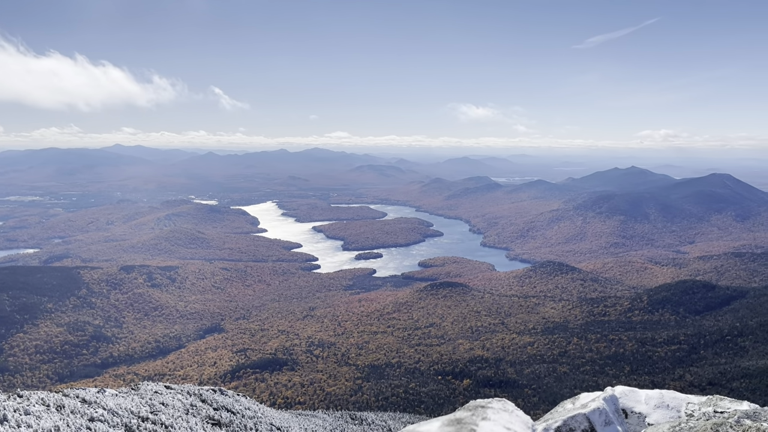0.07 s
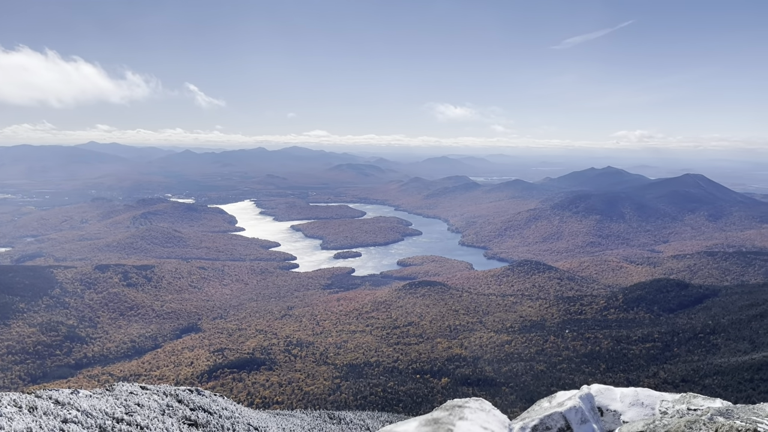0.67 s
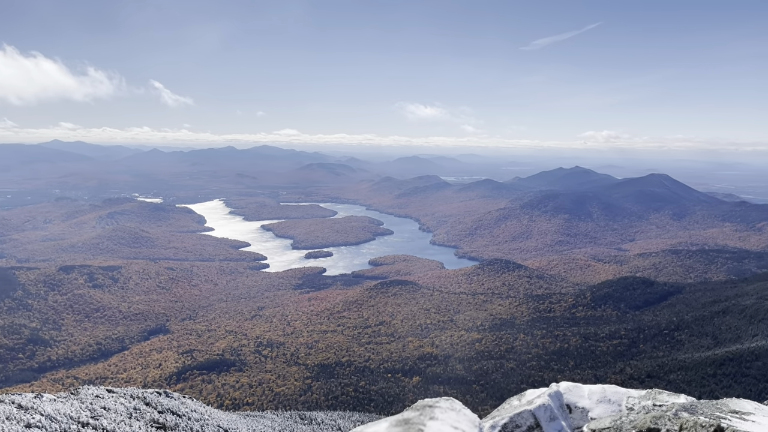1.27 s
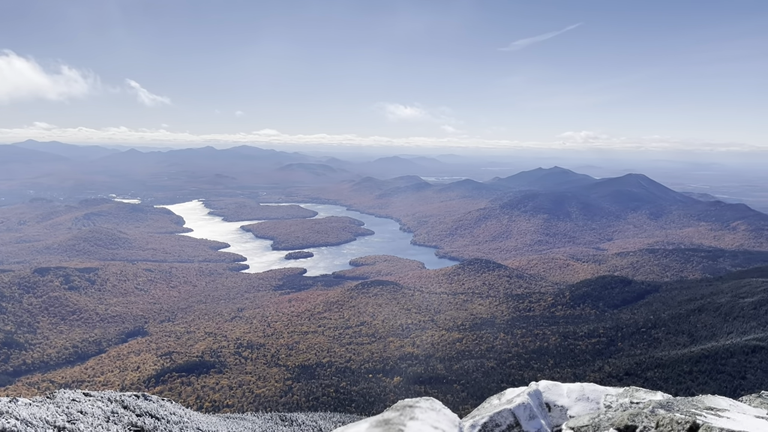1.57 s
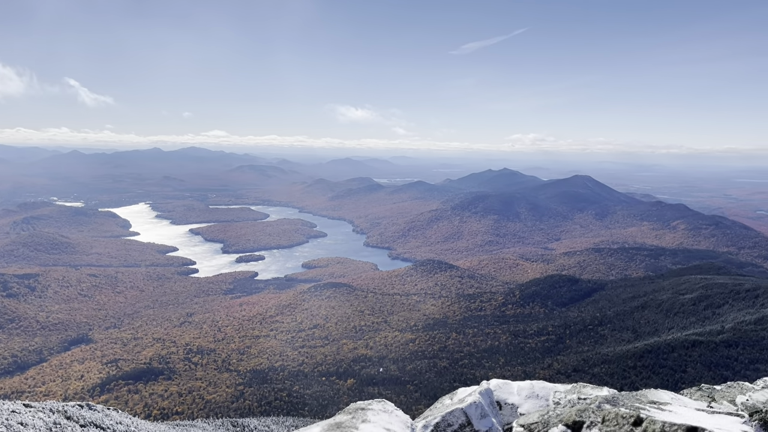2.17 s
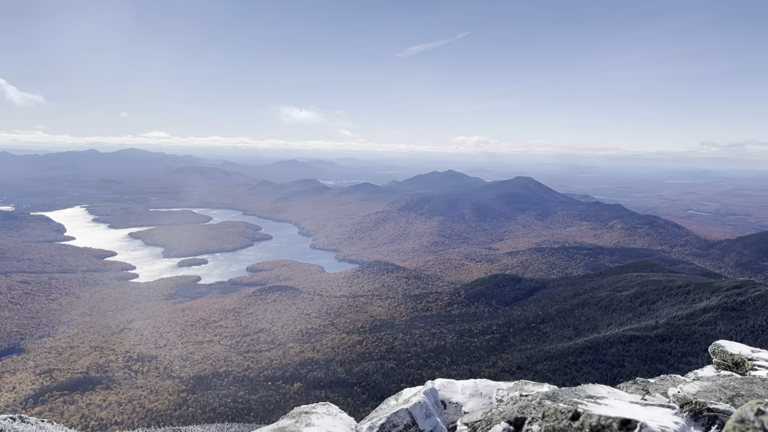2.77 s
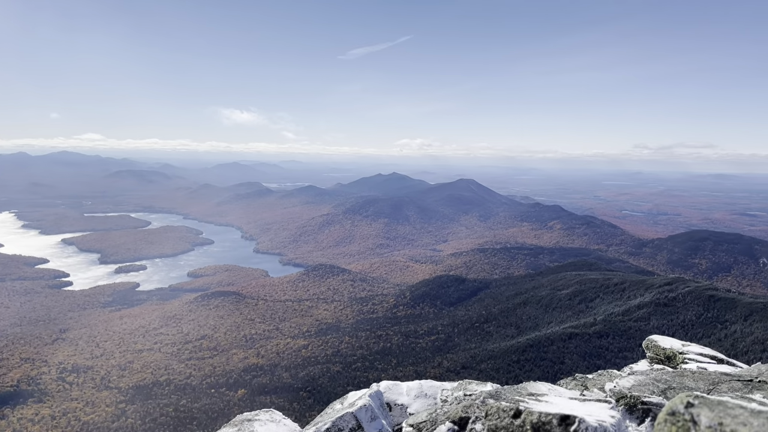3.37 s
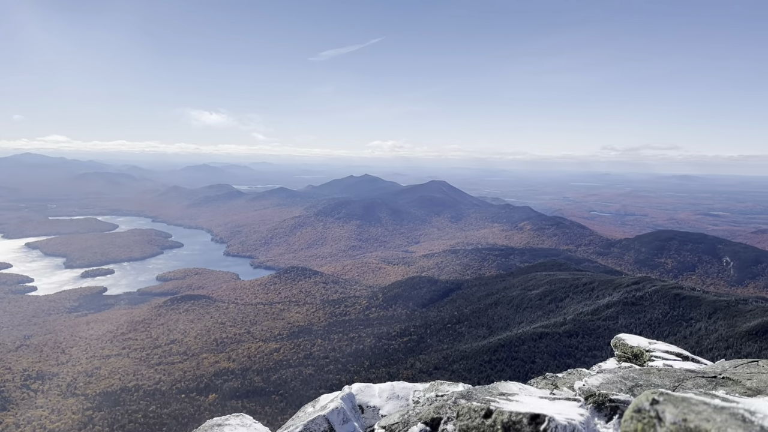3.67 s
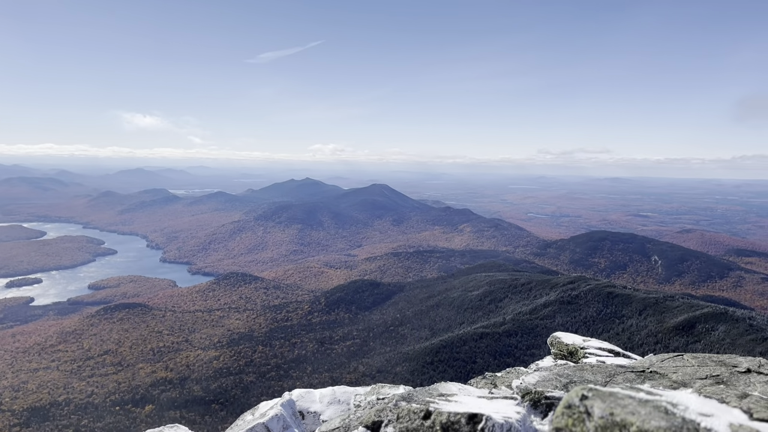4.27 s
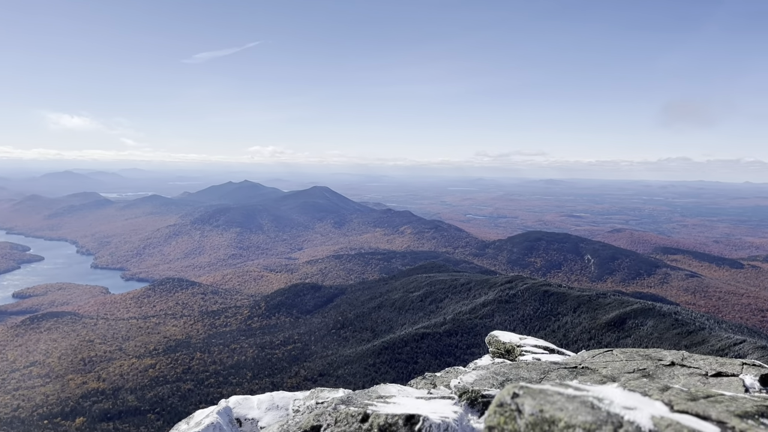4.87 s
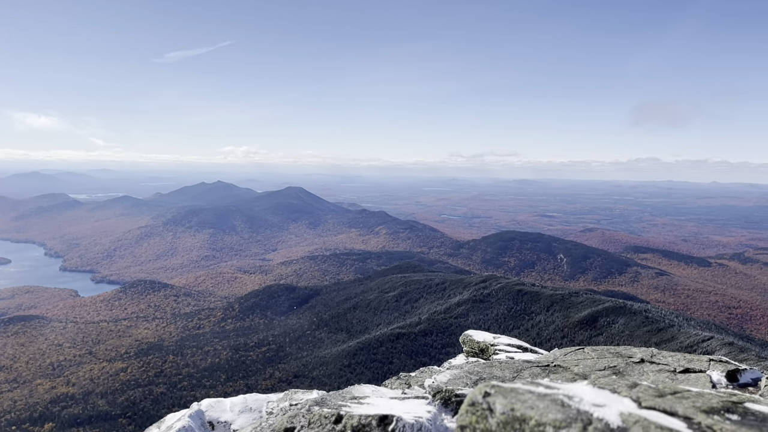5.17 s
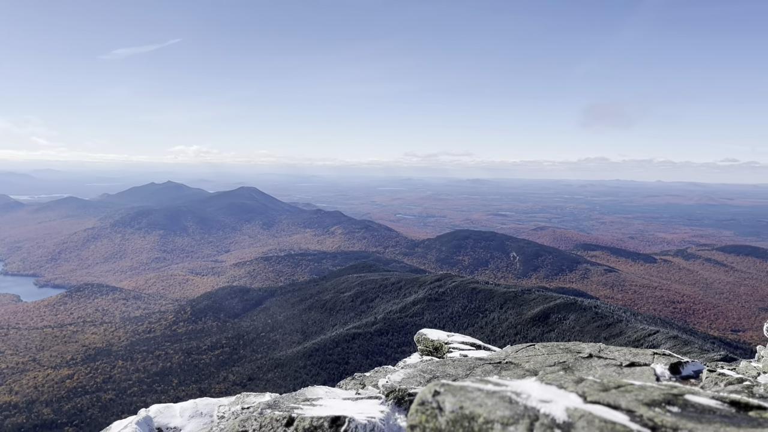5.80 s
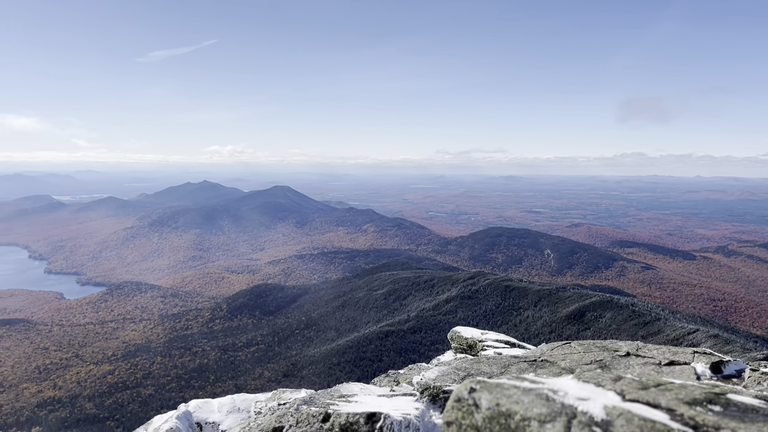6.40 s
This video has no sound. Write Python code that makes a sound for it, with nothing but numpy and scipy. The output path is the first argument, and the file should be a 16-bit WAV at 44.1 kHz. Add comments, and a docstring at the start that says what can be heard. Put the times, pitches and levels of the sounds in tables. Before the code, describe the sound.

Wind rumbles and thumps on the microphone outdoors, drops to a short lull, then gusts again over a faint hiss.

```python
"""Summit wind on a hand-held phone

Wind on a bare mountain top buffets the phone's two microphone openings (ports), eases briefly and returns.
Big swirls of air (eddies) rumble in both ports alike; small ones slap each port more separately and get
brighter and more ragged as they get stronger. The crests of the gusts rush, crack and sing thinly.
The hand on the casing ticks faintly over a hiss of open air."""
import sys
import numpy as np
from scipy import signal
from scipy.fft import rfft, irfft
from scipy.io import wavfile
from scipy.ndimage import uniform_filter1d, minimum_filter1d

SR = 44100
rng = np.random.default_rng(int(sys.argv[2]) if len(sys.argv) > 2 else 0)


def persist_wave(psi):
    """Save psi, clipped to +-1, as 16-bit WAV."""
    counts = np.round(np.clip(psi, -1, 1) * 32767).astype(np.int16)
    wavfile.write(sys.argv[1], SR, np.atleast_2d(counts).T)


N = 292824
TIME = np.arange(N) / SR
FREQS = np.maximum(np.fft.rfftfreq(N, 1 / SR), 1)
REFERENCE_DB, CHOKE_DB = -20, 7  # a typical wind force, and how far above it the ports choke

# how left and right compare: (pitch [Hz], likeness [0-1], left minus right [dB], left lead [radians])
STEREO = [(50.3, 0.95, -1, 0), (157, 0.74, 0, 0.68), (382, 0.87, 0.5, -0.94), (630, 0.44, 3.5, 0.63),
          (1140, 0.8, 4, -2.16), (1790, 0.6, 0, -0.15), (4000, 0, 8, 1)]
# the flow stalls for an instant: (time [s], dip [dB])
STALLS = [(0.058, -7.5), (.365, -9), (0.781, -7.5), (0.84, -4.5), (1.765, -11.5), (1.955, -5.5),
          (2.24, -1.5), (2.55, -9), (2.81, -4), (3.168, -6.5), (3.765, -4), (4.135, -3.5), (4.228, -8.5),
          (4.51, -18.5), (4.815, -4), (4.968, -4), (5.372, -4.5), (6.29, -12), (6.445, -5)]
STALL_S = 0.022  # half length of a stall


def undb(db):
    """Turn decibels into a factor to multiply by."""
    return 10 ** (np.asarray(db) / 20)


def curve(rows):
    """Join (time [s], value) rows by straight lines."""
    return np.interp(TIME, *np.transpose(rows))


def at_pitch(rows, hz, column=1):
    """Read a table between its rows, with the octaves evenly spaced."""
    rows = np.array(rows, float)
    return np.interp(np.log(hz), np.log(rows[:, 0]), rows[:, column])


def noise(gain):
    """Noise of typical size 1, shaped by a gain for each frequency."""
    x = irfft(rfft(rng.standard_normal(N)) * gain, N)
    return x / x.std()


def wander(hz):
    """A smooth random wobble of typical size 1 that changes about hz times a second."""
    return noise(np.exp(-(FREQS / hz) ** 2))


def pan(db):
    """Left and right gains that make the left louder by db."""
    return undb(np.array([[db], [-db]]) / 2)


def decay(start, fade_s):
    """A loudness shape that jumps to 1 at the start and dies away."""
    return (TIME >= start) * np.exp(-np.clip((TIME - start) / fade_s, 0, 40))


def bumps(rows, half_s):
    """A short, rounded rise or dip for each (time [s], height [dB]) row."""
    return sum(db * np.exp(-np.minimum(((TIME - s) / half_s) ** 2, 40)) for s, db in rows)


def burst(envelope, spectrum):
    """Noise that follows a loudness shape, coloured by (pitch [Hz], level [dB]) rows."""
    colour = undb(at_pitch(spectrum, FREQS))
    return irfft(rfft(rng.standard_normal(N) * envelope) * colour / np.sqrt(np.mean(colour ** 2)), N)


def air(flicker_db=0.7):
    """Open air and the microphones make a wide hiss that flickers a little behind the gusts."""
    # colour of the hiss: (pitch [Hz], level [dB per Hz])
    colour = [(200, -69.5), (1000, -91.5), (1800, -90), (3000, -102), (4800, -100), (6800, -108),
              (8600, -118), (10000, -114), (13000, -117.5), (15500, -130)]
    # the hiss swells and sinks: (time [s], change [dB])
    swell = [(0, 2), (2.1, 1.5), (3.1, -2.5), (4.5, 2), (6.64, -2.5)]
    # which port hisses more: (pitch [Hz], left minus right [dB])
    balance = [(1000, 0), (4500, 9.5), (9000, -4.5)]
    balance_db = at_pitch(balance, FREQS) * np.array([[1], [-1]]) / 2
    gain = undb(at_pitch(colour, FREQS) + balance_db) * np.sqrt(SR / 2)
    hiss = irfft(rfft(rng.standard_normal((2, N))) * gain, N)
    return hiss * undb(curve(swell) + flicker_db * wander(hz=18))


def finger_slide(time_s=0.6, half_s=0.079, level_db=-65, grain_db=3.5):
    """A finger shifts its grip with a short, dry rustle."""
    # colour of skin sliding on the casing: (pitch [Hz], level [dB])
    colour = [(2000, -3), (5000, 2.5), (8500, -15), (10500, -0.5), (13500, -3), (15000, -16)]
    return burst(undb(level_db + grain_db * wander(hz=200)) / np.cosh((TIME - time_s) / half_s), colour)


def finger_ticks(ring_db=-19, ring_s=0.012, grain_db=2):
    """Fingers near the left port make grainy snaps, and the casing rings briefly after each."""
    # fingers on the casing: (time [s], level [dB], fading time [s])
    ticks = [(0.534, -46, 0.0009), (0.922, -41, 0.0025), (0.929, -44.5, 0.0048), (2.616, -38, 0.00081),
             (2.753, -50.5, 0.025), (2.913, -38.5, 0.00069), (3.093, -41.5, 0.00086), (3.269, -44, 0.0014),
             (3.448, -49, .002), (3.647, -49, 0.02), (4.091, -42, 0.00095), (5.385, -41, 0.0011),
             (5.855, -52, 0.0058)]
    # colour of the snap: (pitch [Hz], level [dB])
    snap_colour = [(1500, -23), (2600, -6), (3400, 5.5), (4800, 12), (6800, -1), (8500, -15),
                   (11000, -11.5), (15000, -30)]
    # colour of the ringing casing: (pitch [Hz], level [dB])
    ring_colour = [(2600, -21.5), (3800, -6), (4860, -5.5), (5500, -14), (12000, -49.5)]
    snap = sum(undb(db) * decay(s, fade_s) for s, db, fade_s in ticks) * undb(grain_db * wander(hz=300))
    ring = sum(undb(db + ring_db) * decay(s, ring_s) for s, db, _ in ticks)
    return np.array([burst(snap, snap_colour) + burst(ring, ring_colour) for _ in range(2)]) * pan(db=11)


def whistle(force_db, level_db=-72, growth=0.87, follow_s=.04):
    """Hard flow makes each port sing in a thin band of hiss that surges with the gusts."""
    # colour of the singing ports: (pitch [Hz], level [dB])
    colour = [(9000, -28.5), (9480, -0.5), (9750, -2.5), (10000, -12), (12200, -10.5), (15500, -32.5)]
    gust_db = uniform_filter1d(np.minimum(force_db, CHOKE_DB), int(follow_s * SR))
    return np.array([burst(undb(level_db + growth * gust_db), colour) for _ in range(2)])


def rushes(grain_db=3):
    """Fast air rushes past the port edges in soft swells of treble, stronger on the left."""
    # crests of the gusts: (time [s], level [dB], half length [s])
    crests = [(0.123, -43, 0.0096), (0.876, -48.5, .01), (1.334, -34.5, 0.012), (1.565, -37, 0.045),
              (3.881, -33, 0.01), (4.344, -41, 0.021), (4.674, -34.5, 0.028), (4.895, -28, .016),
              (5.193, -39.5, .035), (5.644, -39.5, 0.011)]
    # colour of a rush: (pitch [Hz], level [dB])
    colour = [(700, -3), (2000, 6.5), (3000, -12.5), (5000, -20), (6800, -29.5), (8700, -50)]
    swell = sum(undb(db) / np.cosh(np.clip((TIME - s) / half_s, -40, 40)) for s, db, half_s in crests)
    return burst(swell * undb(grain_db * wander(hz=120)), colour) * pan(db=5)


def cracks(fade_s=0.0011):
    """The hardest eddies snap at the edge of the left port and reach the right one more weakly."""
    # air tears off the edge: (time [s], level [dB])
    snaps = [(0.4, -44), (0.729, -39.5), (1.362, -18.5), (1.548, -20.5), (1.879, -18), (1.896, -27),
             (2.627, -35), (3.874, -14), (4.019, -26.5), (4.296, -21), (4.353, -22.5), (4.561, -36),
             (4.667, -11.5), (4.883, -24), (5.212, -17), (5.269, -21.5), (5.279, -15), (5.462, -35.5),
             (5.828, -26), (5.983, -19.5), (6.478, -28.5)]
    # colour of a crack: (pitch [Hz], level [dB])
    colour = [(500, -14), (1900, 3), (3000, -8), (4700, -19.5), (7000, -34), (9500, -58)]
    return burst(sum(undb(db) * decay(s, fade_s) for s, db in snaps), colour) * pan(db=5)


def wind_force(flow_db, steady_db=-2, eddy_gap_s=0.05, eddy_fade_s=0.0049, scatter_db=5, steepness=2.3):
    """The push on the ports in dB: steady flow plus eddies that arrive faster than they leave."""
    # the main buffets: (time [s], peak force [dB], fading time [s])
    buffets = [(.112, -19, 0.029), (.165, -25, 0.0088), (.329, -24.5, 0.01), (.398, -14.5, 0.01),
               (.525, -19.5, 0.027), (.602, -21.5, 0.0088), (.668, -27.5, 0.0073), (.726, -20.5, 0.018),
               (.8, -20, 0.0087), (.868, -17, 0.019), (.922, -22.5, 0.046), (1.075, -21, 0.02),
               (1.312, -19, 0.034), (1.36, -11, 0.0071), (1.485, -18.5, 0.031), (1.546, -8.5, 0.016),
               (1.633, -14.5, 0.013), (1.692, -17.5, .016), (1.794, -18.5, 0.012), (1.856, -19, 0.0026),
               (1.885, -16.5, 0.016), (2.005, -27, 0.01), (2.155, -22.5, .006), (2.387, -22.5, 0.01),
               (2.625, -24.5, 0.015), (2.675, -24.5, 0.0074), (2.729, -26, 0.0053), (2.85, -29.5, 0.024),
               (2.955, -34.5, .011), (3.055, -24.5, 0.0085), (3.085, -28, 0.004), (3.251, -31, 0.02),
               (3.385, -40.5, 0.005), (3.514, -33.5, 0.011), (3.602, -15.5, 0.0011), (3.838, -19, 0.0094),
               (3.872, 0, 0.012), (3.9, -12, 0.0044), (3.98, -21.5, 0.018), (4.02, -15.5, 0.0034),
               (4.054, -19.5, 0.003), (4.1, -25, 0.0063), (4.19, -17, 0.016), (4.257, -18.5, 0.0058),
               (4.295, -15.5, 0.0077), (4.335, -14.5, 0.034), (4.415, -22, 0.014), (4.56, -11.5, 0.0016),
               (4.63, -17.5, 0.086), (4.698, -11.5, 0.019), (4.75, -17, 0.0053), (4.785, -17, 0.0064),
               (4.842, -18.5, 0.0093), (4.885, -4, 0.015), (4.942, -18.5, 0.007), (4.99, -15, 0.011),
               (5.16, -12.5, 0.02), (5.208, -12, 0.021), (5.283, -15, 0.014), (5.347, -20.5, 0.0061),
               (5.393, -3.5, 0.0078), (5.462, -18, 0.0047), (5.552, -22.5, 0.0046), (5.64, -18.5, 0.015),
               (5.707, -14.5, 0.0024), (5.77, -19.5, 0.011), (5.823, -16, 0.0025), (5.986, -15, 0.01),
               (6.01, -18, 0.0033), (6.052, -20.5, 0.005), (6.122, -22, 0.021), (6.335, -26.5, 0.023),
               (6.603, -18.5, 0.037)]
    # lesser eddies come by chance, about as strong as the flow
    gap, size, span = rng.standard_normal((256, 3)).T
    times = np.cumsum(np.exp(gap / 2)) * eddy_gap_s
    eddy_db = np.interp(times, TIME, flow_db) - 0.14 + scatter_db * np.tanh(size)
    lesser = np.column_stack([times, eddy_db, eddy_fade_s * np.exp(span / 2)])[times < TIME[-1]]
    power = undb(flow_db + steady_db) ** 2
    for s, db, fade_s in [*buffets, *lesser]:
        near = slice(max(int((s - 5 * fade_s) * SR), 0), int((s + 10 * fade_s) * SR))
        age = (TIME[near] - s) / fade_s
        power[near] += (undb(db) / np.cosh(np.where(age < 0, steepness * age, age))) ** 2
    return 10 * np.log10(power) + bumps(STALLS, STALL_S)


def eddies(hz, hold_s=0.033):
    """Eddies of one size: half an octave of pressure swings around hz, evened out in strength."""
    swings = noise(np.cos(np.pi / 2 * np.clip(2 * np.log2(FREQS / hz), -1, 1)))
    window = int(SR * (hold_s + 2 / hz))
    return swings / np.sqrt(uniform_filter1d(swings ** 2, window) + .1)


def rumble_level(gust_db, level_db=1, growth=0.72, wobble_db=2.2):
    """Large eddies rumble with the gusts (in dB); heavy ones swell the rumble and stalls starve it."""
    # the heaviest eddies land as thumps: (time [s], lift [dB])
    thumps = [(.188, 5.5), (.29, 10.5), (.67, 9), (1.1, 3.5), (1.312, 8.5), (1.52, 5), (1.81, 5),
              (1.902, 7), (2.085, 4), (4.196, 4.5), (4.68, 8.5), (4.995, 7), (5.18, 9.5), (5.402, 8.5),
              (5.775, 4.5), (5.828, 4)]
    rumble_db = level_db + growth * gust_db + wobble_db * wander(hz=30)
    return rumble_db + bumps(thumps, half_s=0.02) + .5 * bumps(STALLS, STALL_S)


def wind(flow_db, force_db, flutter_db=1.82, knee_db=2, tear_db=2.5, drift_db=2.23):
    """Churning air, band by band: low bands follow the large eddies, high ones the push on the ports."""
    # colour of the churning air at the typical force: (pitch [Hz], level [dB per Hz])
    turbulence = [(20, -54.5), (30, -57), (45, -38), (70, -32), (120, -37.5), (200, -42), (400, -42),
                  (700, -49.5), (1000, -56.5), (1700, -73), (2800, -88), (8000, -117), (15000, -130)]
    # how fast each pitch grows with force: (pitch [Hz], growth [dB per dB])
    growth = [(200, 1.21), (350, 1.14), (500, 1.24), (1000, 1.8), (2000, 2.5), (4000, 2), (9000, -0.6)]
    # how closely the bass follows single eddies: (pitch [Hz], share [0-1])
    thump_share = [(35, 0.26), (70, 0.45), (140, 0.87)]
    gust_db = uniform_filter1d(force_db, int(0.22 * SR))  # the force, averaged over 0.22 s
    rumble_db = rumble_level(gust_db)
    thump_db = force_db - gust_db  # whatever stands out of the gust thumps in the bass
    push_db = force_db + flutter_db * wander(hz=70)
    # the ports choke: the hardest pushes gently level off
    push_db = push_db - knee_db * np.logaddexp(0, (push_db - CHOKE_DB) / knee_db)
    # air tears off the edge of each port in short spits
    spits_db = tear_db * np.array([wander(hz=400), wander(hz=400)])
    tilt_db_per_octave = -0.4 + 0.16 * (flow_db - REFERENCE_DB)  # faster flow sounds brighter
    large_hz, small_hz = 130, 280  # between these, large eddies give way to small ones
    drift = wander(hz=20)
    pressure = np.zeros((2, N))
    for hz in 22 * 2 ** (np.arange(19) / 2):
        cycle = int(SR / hz)  # a low band needs about one cycle to answer a thump
        answer_db = uniform_filter1d(thump_db, cycle, origin=(cycle - 1) // 2)
        large_db = rumble_db + at_pitch(thump_share, hz) * answer_db
        drift = .7 * drift + .7 * wander(hz=20)  # each band comes and goes with its neighbours
        small_db = at_pitch(growth, hz) * (push_db + min(hz / 1500, 1) * spits_db)
        small_db = small_db + tilt_db_per_octave * np.clip(np.log2(hz / 700), -2, 2) + drift_db * drift
        small_share = np.clip(np.log(hz / large_hz) / np.log(small_hz / large_hz), 0, 1)
        band_db = at_pitch(turbulence, hz) + (1 - small_share) * large_db + small_share * small_db
        alike = np.clip(at_pitch(STEREO, hz), 0, 1)
        shared = eddies(hz) * np.sqrt((1 + alike) / 2)
        apart = eddies(hz) * np.sqrt((1 - alike) / 2)
        width_hz = hz * np.log(2) / 2
        gain = np.sqrt(width_hz) * undb(band_db) * pan(at_pitch(STEREO, hz, column=2))
        pressure += gain * np.array([shared + apart, shared - apart])
    return pressure


def through_phone(pressure):
    """The port hollows colour the wind; the phone's stereo processing puts left and right out of step."""
    # resonances of the hollows: (pitch [Hz], width [Hz], lift [dB])
    cavities = [(1900, 67, 3), (2040, 800, -1)]
    lift_db = sum(db / (1 + (2 * (FREQS - hz) / width) ** 2) for hz, width, db in cavities)
    phase_turn = np.exp(.5j * at_pitch(STEREO, FREQS, column=3) * np.array([[1], [-1]]))
    soft_ends = np.clip(np.minimum(TIME, TIME[::-1]) / .004, 0, 1)
    return irfft(rfft(pressure * soft_ends) * undb(lift_db) * phase_turn, N)


def scene():
    """Wind, hiss and hand together."""
    # steady flow over the ports, two long gusts with a lull between: (time [s], force [dB])
    flow = [(0, -27), (.5, -23.5), (.8, -31), (1.2, -27.5), (1.32, -21), (1.62, -20), (2.05, -23),
            (2.22, -31.5), (2.78, -38), (3.05, -29.5), (3.33, -49), (3.47, -50.5), (3.64, -25.5),
            (3.85, -20), (4.1, -29), (4.62, -19.5), (5.25, -20), (5.45, -23.5), (6.45, -26), (6.64, -33)]
    flow_db = curve(flow)
    force_db = wind_force(flow_db) - REFERENCE_DB
    buffeting = through_phone(wind(flow_db, force_db) + cracks() + rushes())
    return buffeting + whistle(force_db) + air() + finger_ticks() + finger_slide()


def record(dry, hold_s=0.0087, low_hz=30, top_hz=15500):
    """Cut the deepest bass, turn the level down just ahead of the loudest buffets, and cut the top."""
    x = signal.sosfilt(signal.butter(3, low_hz, "high", fs=SR, output="sos"), dry)
    window = int(hold_s * SR)
    safe_gain = (1 + (np.abs(x).max(axis=0) / .95) ** 6) ** (-1 / 6)
    held_gain = minimum_filter1d(safe_gain, 2 * window)
    smooth_gain = uniform_filter1d(uniform_filter1d(held_gain, window), window)
    return signal.sosfilt(signal.ellip(8, .2, 70, top_hz, fs=SR, output="sos"), x * smooth_gain)


dry = scene()
out = record(dry)
persist_wave(out)
```